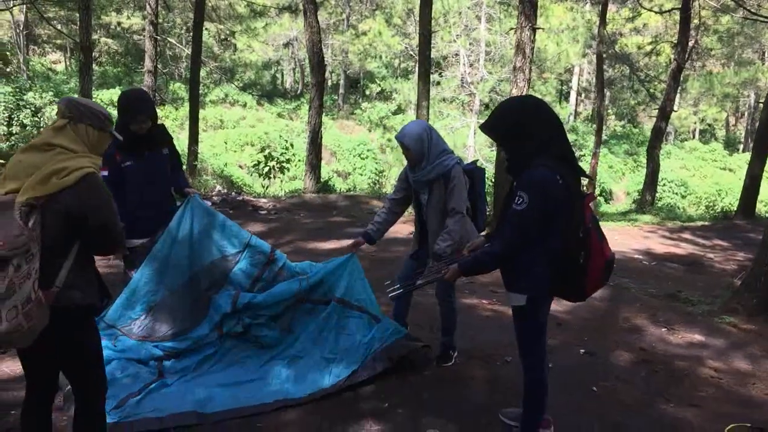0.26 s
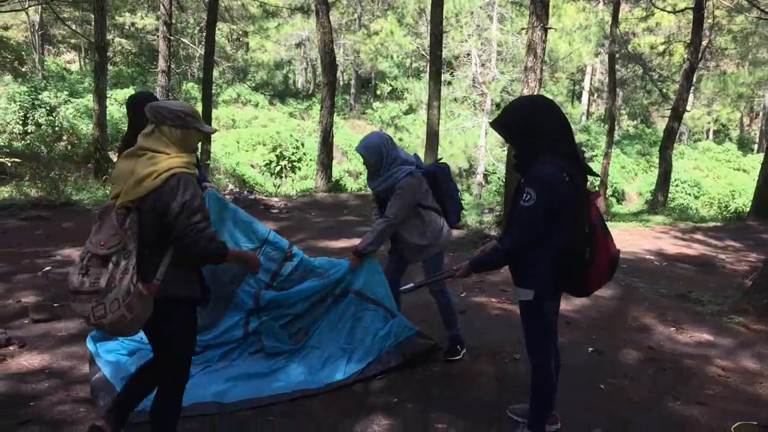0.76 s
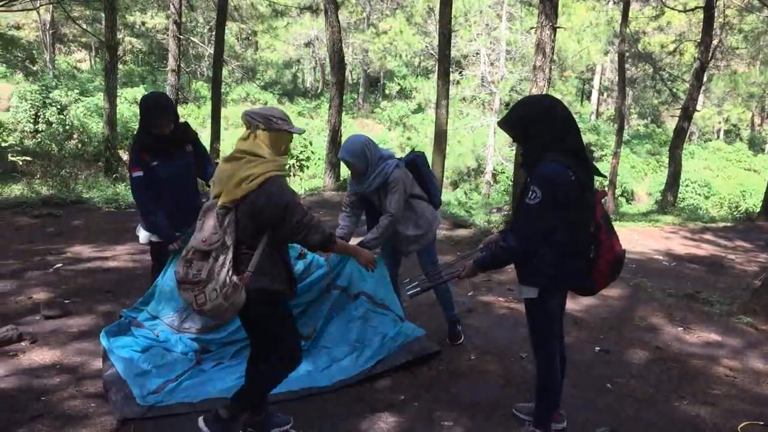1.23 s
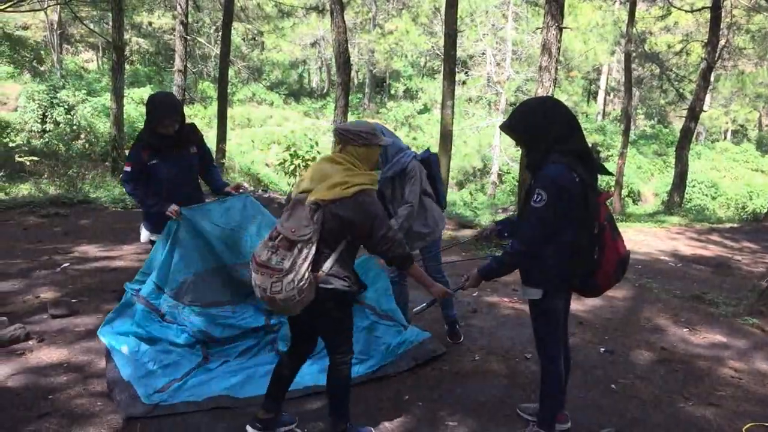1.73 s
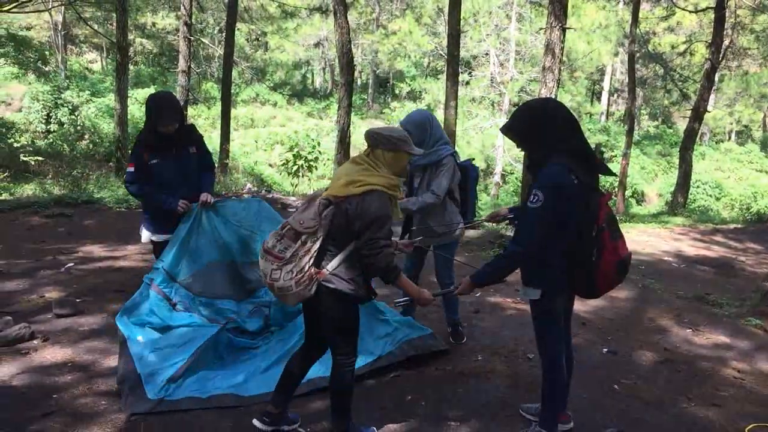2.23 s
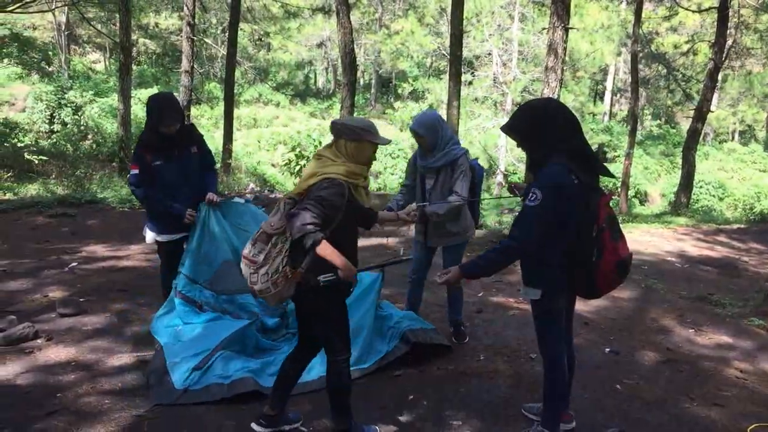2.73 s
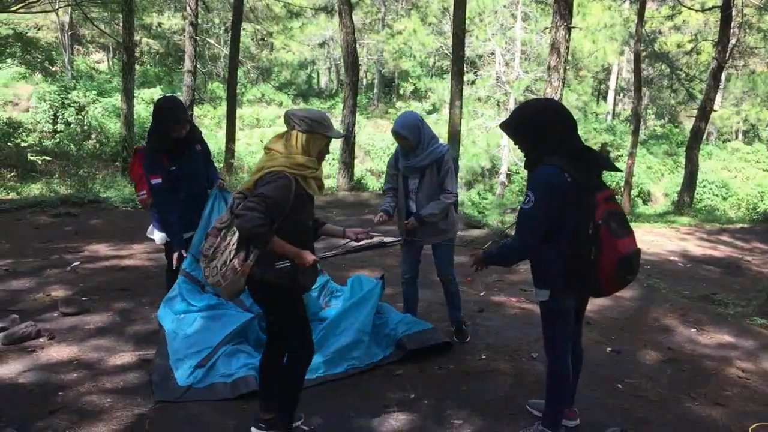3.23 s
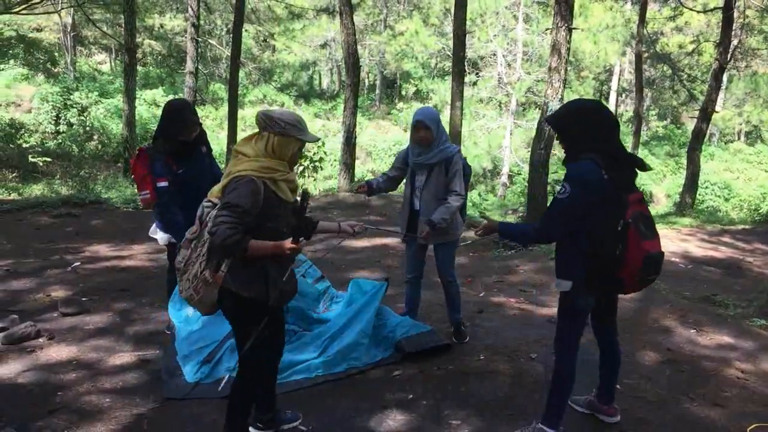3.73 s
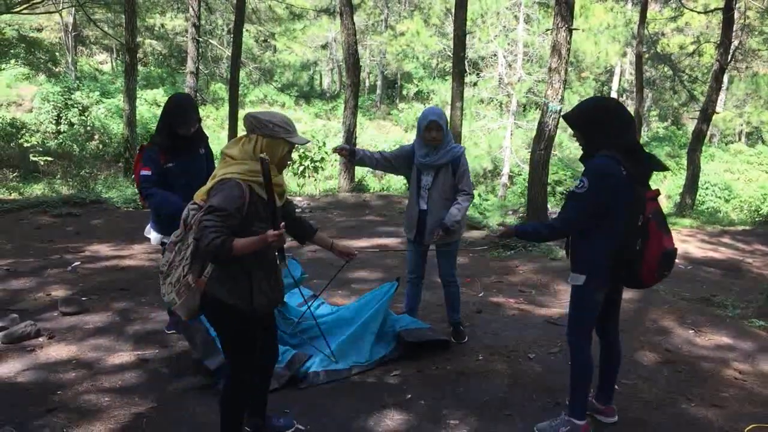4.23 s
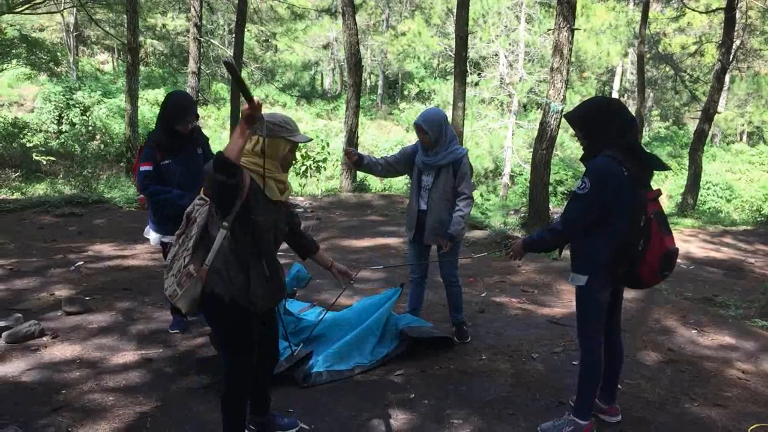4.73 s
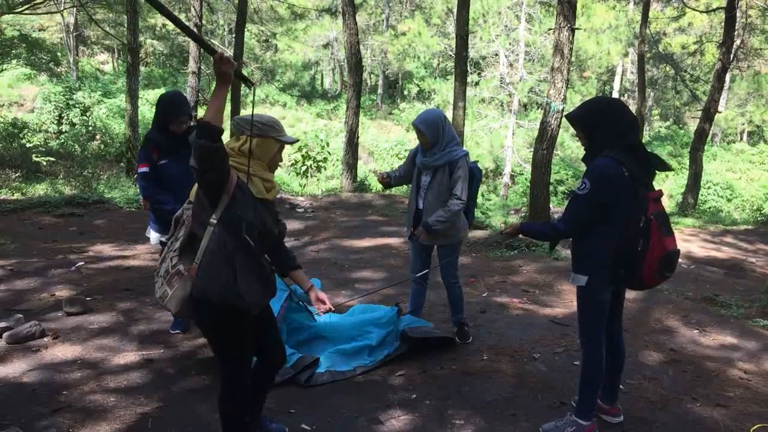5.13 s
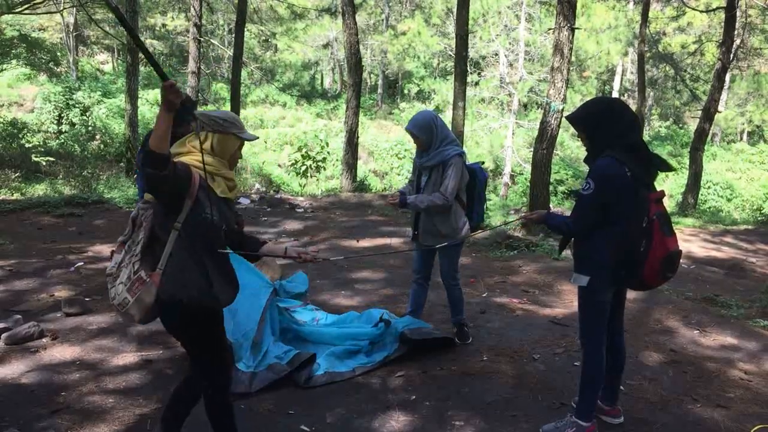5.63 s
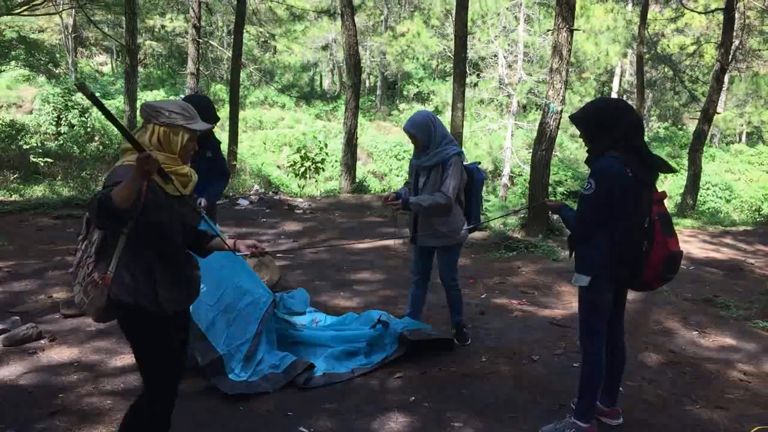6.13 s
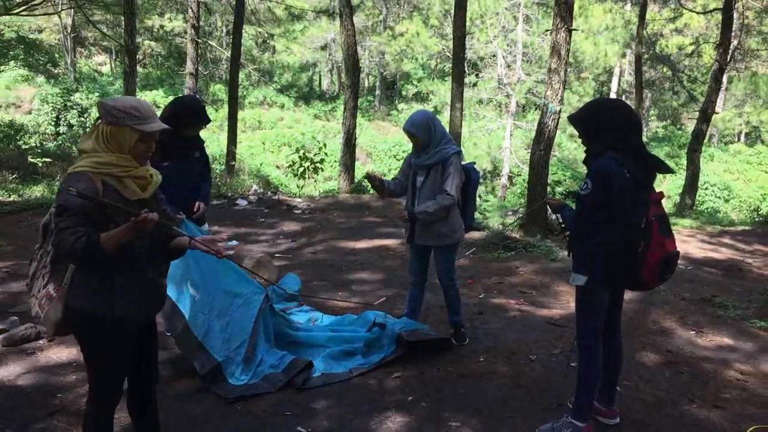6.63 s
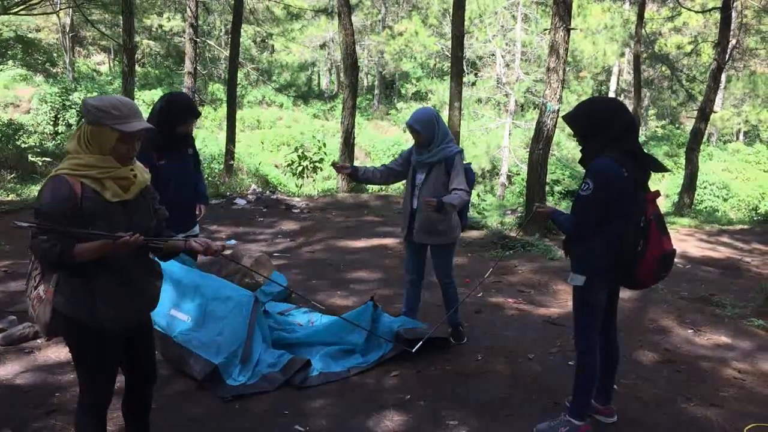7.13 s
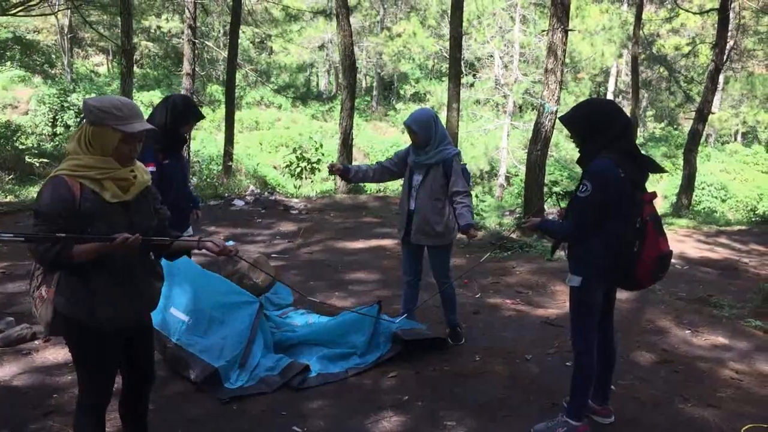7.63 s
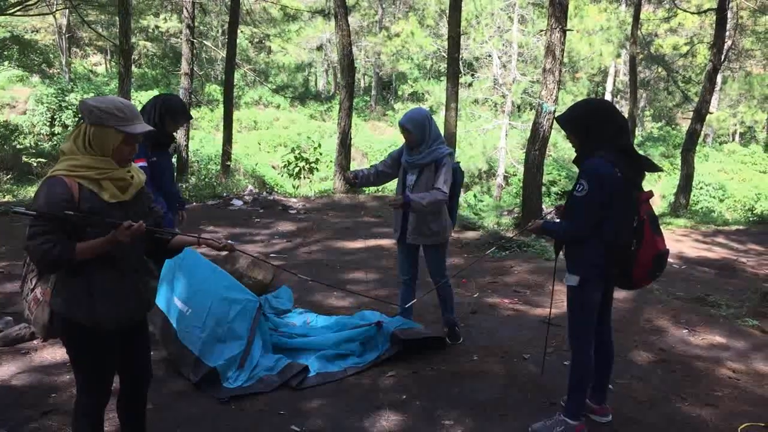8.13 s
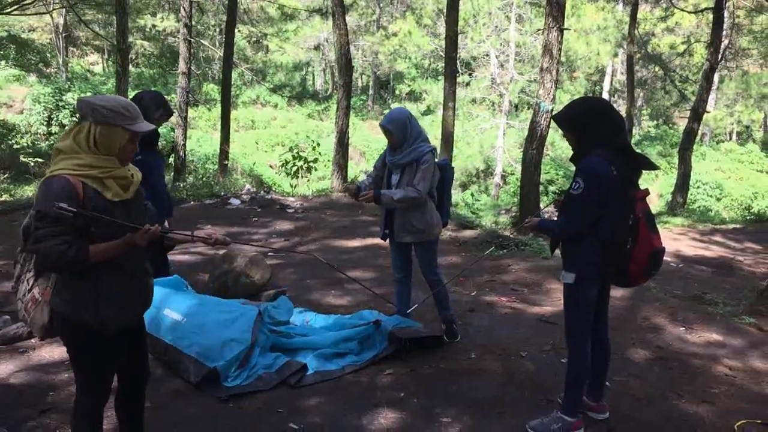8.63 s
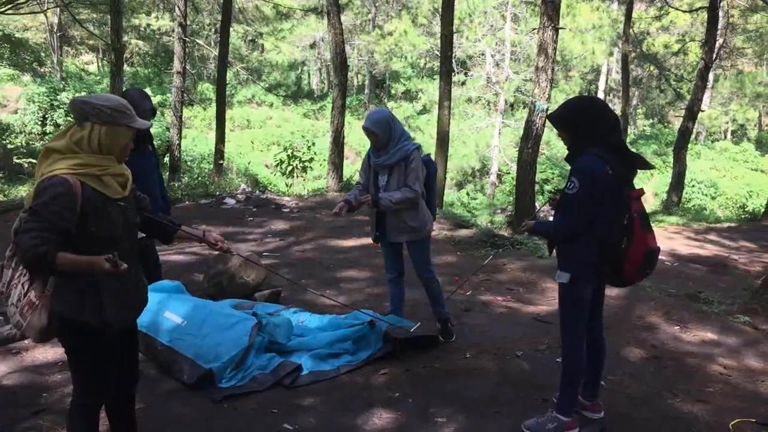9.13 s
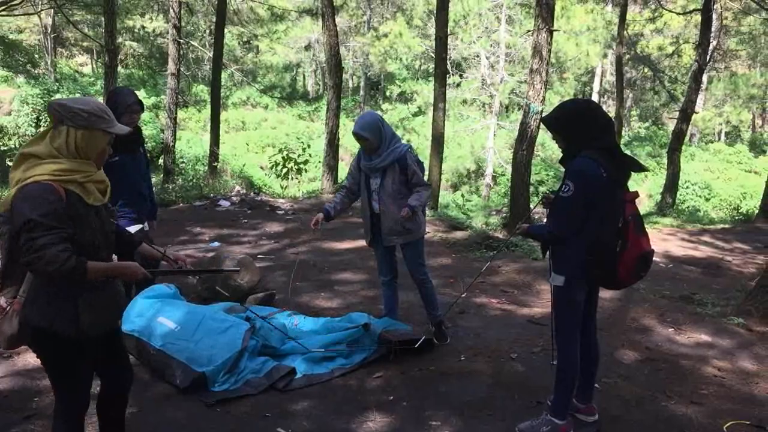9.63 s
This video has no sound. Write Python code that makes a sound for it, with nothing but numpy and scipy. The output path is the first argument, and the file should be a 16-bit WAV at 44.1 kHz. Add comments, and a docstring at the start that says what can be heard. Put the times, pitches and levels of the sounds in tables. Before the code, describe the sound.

Wind booms dully on the microphone over hushing leaves as tent poles click, nylon rustles, a songbird repeats its phrase, and heavy thuds land from midway.

```python
"""Wind booms dully in a microphone housing over the hush of the trees at a forest campsite, and nylon rustles.
Metal tent poles clink as they are fitted together, a songbird repeats a four-note phrase between the trunks,
and from midway poles thud down, the first close by. The sound stops short near the end.
Wind, leaves and cloth are resonated noise or grains; poles are struck modes; thuds are dispersed pulses
with a rumble; the bird is gliding sines with an echo and a haze."""
import sys
import numpy as np
from scipy import signal
from scipy.fft import rfft, irfft, next_fast_len
from scipy.io import wavfile
from scipy.ndimage import uniform_filter1d

SR = 44100
rng = np.random.default_rng(int(sys.argv[2]) if len(sys.argv) > 2 else 0)


def volts_from_decibels(level):
    """Turn decibel levels (scalar or array-like) into linear amplitude factors."""
    exponent = np.asarray(level, float) / 20
    return 10 ** exponent


def persist_wave(psi):
    """Save psi, clipped to +-1, as 16-bit WAV."""
    counts = np.round(np.clip(psi, -1, 1) * 32767).astype(np.int16)
    wavfile.write(sys.argv[1], SR, np.atleast_2d(counts).T)


N = 435266

# cavity resonances of the housing: (centre [Hz], nominal width [Hz], relative level [dB])
PUFF_MODES = [(46, 22, 0)]
BUFFET_MODES = [(85, 15, 1), (133, 22.5, -8), (63, 22, -15.5)]
ROAR_MODES = [(192.1, 32.5, -1.5), (276.5, 46.3, 0), (341, 46, -2.5), (412.5, 50.3, -1.5), (490.7, 32, -12)]
# puffs that press on the membrane: (time of the peak [s], level [dB])
PUFFS = [(.68, -48), (1.909, -52), (2.01, -46), (2.23, -46), (2.471, -48), (3.7, -32), (3.86, -39),
         (4.29, -48), (4.711, -45), (5.08, -40.5), (5.73, -37), (6.01, -51), (6.42, -52), (7.16, -38),
         (7.569, -44), (7.89, -35), (7.991, -47), (8.6, -43), (8.8, -42)]
# swells of the deep buffeting: (time of the peak [s], level [dB])
SWELLS = [(.12, -43), (.32, -33), (0.831, -39), (1.36, -43), (1.62, -24), (1.84, -41), (2.28, -41),
          (2.522, -28), (3.152, -27), (3.49, -30), (3.82, -26.5), (4.07, -32), (4.34, -34), (4.679, -31),
          (4.8, -30), (5.15, -19), (5.39, -35), (5.8, -26), (6.52, -28), (6.81, -30), (6.96, -33),
          (7.21, -36), (7.57, -44), (8.33, -30), (8.681, -28), (8.82, -26)]
# colour of the leaves: (frequency [Hz], density [dB per Hz])
LEAF_COLOUR = [(560, -11), (680, 9), (770, -2), (860, 3.5), (1100, -0.5), (2000, -0.5), (2650, -0.5),
               (3050, -7), (3600, -5.5), (4200, -7), (4850, -12), (5400, -10.5), (6200, -14), (7500, -18.5),
               (9500, -15), (10600, -20), (15700, -25.5)]
# hands, and the fallen pole, moving the nylon:
# (time of full level [s], hold [s], level before clumping [dB], crisp treble against that [dB])
SCUFFS = [(0, 0.31, -47.5, -13), (1.076, 0.03, -46, -10), (1.539, 0.039, -40.5, -24),
          (1.604, 0.04, -42, -9), (1.652, 0.039, -37, -16), (1.71, 0.069, -39, -18.5),
          (1.956, 0.2, -47, -21), (2.222, 0.036, -39, -21), (2.29, 0.042, -44, -17),
          (2.907, 0.036, -46, -17.5), (3.074, 0.042, -52, -19), (3.393, 0.2, -52, -11.5),
          (3.882, 0.278, -45, -21.5), (5.08, 0.045, -37.5, -15.5), (5.142, .045, -43, -17),
          (5.203, 0.035, -50.5, -20), (5.25, 0.23, -51, -16), (7.005, 0.11, -54, -9),
          (8.806, 0.2, -58.5, 1)]
# poles touching each other (high) or cloth and ground (low):
# (time [s], peak before the dip of the microphone port [dB], centre of the ring [Hz],
# its spread [octaves], chatter [s])
CLINKS = [(0.2136, -37.5, 5900, .6, 0.0055), (1.071, -44, 4960, .6, .01), (2.078, -41, 5000, .5, .004),
          (2.082, -37.5, 7500, 0.69, 0.036), (2.213, -35.5, 4300, .5, 0.0037),
          (3.17, -35.5, 5200, .5, 0.0061), (3.271, -42, 6000, .8, 0.0044), (3.297, -39, 8900, 1.2, 0.02),
          (3.3248, -27.5, 6600, 0.39, 0.0029), (3.3333, -30, 5650, 1.4, 0.0065),
          (3.536, -41, 5670, .5, 0.0055), (3.65, -35, 5660, 0.44, 0.0045), (3.686, -34, 7600, 0.48, 0.0062),
          (3.965, -16, 5500, 0.4, 0.0027), (4.753, -25.5, 5000, 0.64, 0.0093),
          (4.961, -23, 4600, 0.56, 0.004), (5.0144, -45, 6200, 0.57, .008),
          (5.426, -40, 5690, 0.37, 0.0044), (6.18, -50, 11500, 0.45, 0.0052),
          (7.204, -42, 6360, 0.6, 0.025), (7.615, -39.5, 7860, 0.43, 0.027),
          (8.6275, -36, 6200, 0.4, 0.013), (0.293, -26, 1710, 0.7, 0.0056),
          (1.177, -30, 1400, 0.55, 0.0061), (1.545, -30, 1390, 0.72, 0.0097),
          (1.606, -28, 985, 0.33, 0.0062), (1.672, -24.5, 2060, 0.86, 0.0039), (1.635, -35, 2600, .4, .004),
          (1.682, -42, 950, .3, 0.0056), (1.728, -28.5, 1000, .4, .004), (1.742, -36, 2300, .4, 0.0032),
          (1.988, -38, 1700, .5, 0.0045), (2.293, -34, 1600, .5, 0.0036), (2.374, -37, 1600, 0.56, 0.0044),
          (.01, -33, 1900, .4, .004), (.035, -32.5, 1800, .5, 0.0066), (1.702, -32.5, 1970, 0.26, 0.0044),
          (1.758, -25, 1700, 1.1, 0.003), (1.762, -24, 920, .3, .006), (1.606, -38.5, 4000, .3, .004),
          (1.672, -30.5, 4000, .25, .004), (1.657, -25.5, 2300, .4, .006), (2.134, -31.5, 1720, 0.39, 0.01),
          (2.208, -31, 1700, 0.49, 0.0056), (2.955, -29.5, 960, 0.25, 0.0039),
          (3.075, -33, 935, 0.31, 0.0056), (4.13, -35, 1020, 0.44, 0.0022),
          (4.752, -16.5, 1920, 0.72, 0.0056), (5.0695, -19.5, 1200, 0.76, 0.0056),
          (5.072, -24, 2350, 0.32, 0.0085), (5.109, -30.5, 1700, 0.46, 0.0037), (5.175, -44, 1500, .3, .01),
          (5.675, -42, 1900, 0.23, .006), (6.886, -36, 1300, 0.18, 0.0059), (8.838, -30, 930, 0.2, 0.0083)]
# modes of a pole section held in the hand: (frequency [Hz], level [dB], nominal t60 [s])
POLE_MODES = [(924, 7, 0.024), (1200, 14.5, 0.0096), (1605, 12.5, 0.013), (1970, 16, 0.014),
              (2293, 12, 0.0072), (3820, 15.5, 0.015), (4540, 8.5, 0.0078), (5200, 1.5, 0.0099),
              (6200, 2.5, 0.011), (6900, -12, 0.015), (8740, -10, 0.009), (9720, -12.5, 0.0046),
              (11500, -6.5, 0.0034), (12930, -9, .004)]
# notes of the phrase: (time from the note's mark [s], frequency [Hz], relative level [dB])
CHIP = [(-.036, 3640, -18.5), (-.032, 3640, -3), (-.021, 3580, 3), (-.014, 3590, -15.5), (.002, 3580, -39)]
DOWN_SLUR = [(.002, 3950, -21), (.005, 4006, 1), (.013, 3730, -2), (.022, 3475, -3), (.032, 3200, -13),
             (.045, 2960, -29.5)]
FALL = [(-.058, 4360, -14), (-.046, 3750, -14.5), (-.03, 3380, -12.5), (-.012, 3300, -13.5),
        (.002, 3340, -8.5)]
RISE = [(-.004, 3360, -41), (.012, 3450, -4.5), (.026, 3880, -7.5), (.032, 4050, -6), (.043, 3980, -26.5)]
# opening notes of each phrase: (time [s], pitch ratio [1], chip level [dB], down-slur level [dB])
PHRASES = [(1.536, 1.006, -31.5, -33.5), (2.907, 1.01, -31, -31.5), (4.141, 1.03, -40, -34.5),
           (5.422, .995, -54, -41.5), (6.693, 1.005, -55, -34.5), (8.163, 0.96, -47, -39.5)]
# the swoop that answers them: (time near its lowest point [s], pitch ratio [1], fall level [dB], rise level [dB])
SWOOPS = [(.167, 1, -31, -29), (1.822, 1, -31, -37), (3.223, 0.97, -39, -37.5), (4.471, 1, -37, -44),
          (5.78, .99, -43.5, -40), (7.155, 0.98, -43, -37), (8.535, 0.98, -41.5, -35.5)]
# level whistles and single pips: (time [s], length [s], frequency [Hz], level [dB])
WHISTLES = [(0.018, 0.011, 3910, -39), (0.07, 0.018, 3820, -42), (0.249, 0.02, 3110, -43),
            (.308, 0.014, 3980, -50), (3.075, 0.051, 4180, -61), (1.379, 0.073, 3310, -45.5),
            (2.655, 0.05, 3320, -55.5), (2.72, 0.055, 3300, -51), (2.783, 0.056, 3310, -56),
            (3.935, 0.11, 3290, -49.5), (1.998, 0.027, 3850, -52), (5.279, 0.057, 3256, -48.5),
            (5.868, .02, 3110, -53), (6.269, 0.015, 3300, -48.5), (6.415, 0.12, 3244, -59),
            (6.536, 0.071, 3250, -46.5), (6.947, .02, 4060, -49), (6.973, 0.075, 4030, -57),
            (7.055, 0.019, 3910, -54), (7.09, .012, 4210, -54), (7.974, 0.099, 3250, -50),
            (8.63, 0.022, 3110, -51), (8.87, 0.016, 3900, -45), (8.947, 0.019, 3880, -40.5)]
# heavy blows: (time [s], peak of the blow [dB], treble shelf [dB], rumble before it dies away [dB])
THUDS = [(5.066, 1.5, -3, -18), (6.8824, -5.5, -14, -27), (7.922, -17, -20, -40), (8.838, -14, -20, -28)]
# colour of a blow: (frequency [Hz], level [dB])
THUD_COLOUR = [(40, -22), (90, -4.5), (190, 0), (300, -12), (500, -38), (1100, -33), (2300, -43),
               (3000, -58), (5000, -85)]

# steady strength of the wind on the housing: slow pressure, deep buffeting, hollow roar
LULL_DB, BUFFET_DB, ROAR_DB = -62, -35.5, -28.5
PUFF_RISE_S, PUFF_FALL_S = 0.042, 0.054
SWELL_RISE_S, SWELL_FALL_S = 0.022, 0.029
TREES_DB = -45  # before the breeze eases
SCUFF_RISE_S, SCUFF_FALL_S, SLACK_DB = 0.0093, 0.018, -57  # slack: cloth at rest
CRACK_DB = 0  # the bare contact against the ring
BEND_S = .155  # delay of a bending wave at 1 Hz; highs arrive first
TRUNKS_T60_S, TRUNKS_DB = .7, -5.5
ECHO_S, ECHO_DB, ECHO_SMEAR_S = .024, -12.5, .005  # the nearest big trunk throws each note back
STOP_S = 8.967


def level(x, db):
    """Normalisation: scale to an rms level."""
    return x * volts_from_decibels(db) / np.sqrt(np.mean(x ** 2))


def shape(points, size):
    """Spectral weighting: gain of (frequency [Hz], level [dB]) points on the bins of a real transform."""
    hz, db = np.transpose(points)
    log_f = np.log(np.arange(1, size // 2 + 2) * SR / size)
    low_cut_db = 30 * np.clip(np.log(hz[0]) - log_f, 0, None)
    return volts_from_decibels(np.interp(log_f, np.log(hz), db) - low_cut_db)


def resonate(x, hz, width):
    """Damped oscillator: a two-pole resonance, gain 1 at the centre."""
    return signal.lfilter(*signal.iirpeak(hz, hz / width, SR), x)


def walk(rate):
    """Slow random modulation: levels held for 1 / rate s and slewed twice; spread about 0.7."""
    k = int(SR / rate)
    held = np.repeat(rng.standard_normal(N // k + 1), k)
    return 0.96 * uniform_filter1d(uniform_filter1d(held, k), k)[:N]


def add(out, s, x):
    """Superposition: mix x into out from time s on."""
    i = int(s * SR)
    x = x[max(-i, 0):len(out) - i]
    out[max(i, 0):max(i, 0) + len(x)] += x


def bumps(rest_db, rows, rise, fall):
    """Addition of powers: a resting level plus (time of full level [s], hold [s], level [dB]) bumps."""
    t = np.arange(0, N, 64) / SR
    power = volts_from_decibels(rest_db) ** 2
    for s, hold, db in rows:
        before = np.clip(s - t, 0, None)
        after = np.clip(t - s - hold, 0, None)
        power = power + volts_from_decibels(db) ** 2 * np.exp(-(before / rise) ** 2 - 2 * after / fall)
    return np.interp(np.arange(N) / SR, t, np.sqrt(power))


def grains(rate, spread_db, cycles, low_hz, top_hz, tilt_db):
    """Shot noise: random kicks of uneven size ring resonances a quarter-octave apart, rate per s in each."""
    out = 0
    for octave in np.arange(0, np.log2(top_hz / low_hz), 1 / 4):
        hz = low_hz * 2 ** octave
        struck = rng.random(N) < rate / SR
        boost = np.minimum(rng.exponential(size=N), 3)  # cap on the largest grain
        kicks = struck * rng.standard_normal(N) * volts_from_decibels(spread_db * boost)
        ring = resonate(resonate(level(kicks, 0), hz, hz / cycles), hz, hz / cycles)
        out = out + volts_from_decibels(tilt_db * octave) * ring
    return out


def leafy(x):
    """Linear filtering: the colour shared by all that rustles, from the wood and the microphone port."""
    size = next_fast_len(N + N % 2, True) // 2 * 2 + 2
    return irfft(rfft(x, size) * shape(LEAF_COLOUR, size), size)[:N]


def wind():
    """Cavity resonance: eddies drive each mode of the housing, each flickering by itself; puffs press on it."""
    gains = (bumps(LULL_DB, [(s, 0, db) for s, db in PUFFS], PUFF_RISE_S, PUFF_FALL_S),
             bumps(BUFFET_DB, [(s, 0, db) for s, db in SWELLS], SWELL_RISE_S, SWELL_FALL_S),
             volts_from_decibels(ROAR_DB + 1.3 * walk(6.5)))
    out = 0
    for modes, gain, flicker_scale in zip((PUFF_MODES, BUFFET_MODES, ROAR_MODES), gains, (2.6, 2.5, 2.1)):
        boom = 0
        for hz, width, db in modes:
            eddies = volts_from_decibels(flicker_scale * walk(14)) * rng.standard_normal(N)
            # two passes narrow the band, so each is wider
            boom = boom + volts_from_decibels(db) * resonate(resonate(eddies, hz, 1.43 * width), hz, 1.43 * width)
        out = out + gain * level(boom, 0)
    return out


def trees():
    """Incoherent sources: far leaves merge, patchy in the middle and smooth on top; nearer ones stir in lumps."""
    bands = 450 * 2 ** np.arange(0, 5.4, 1 / 3)
    patch_scales = np.interp(np.log2(bands), np.log2([1000, 6000]), [3.8, .8])
    far = 0
    for hz, patch_scale in zip(bands, patch_scales):
        patches = volts_from_decibels(patch_scale * (walk(3.01) + walk(12)))
        far = far + patches * resonate(rng.standard_normal(N), hz, hz / 4)
    near_leaves = grains(40, 4.0, 16.0, 597.4, 2700, -2.7)
    hush = level(far, 0) + level(near_leaves, -11.5)
    easing_db = np.interp(np.arange(N) / SR, [2.5, 7.5], [.8, -.8])  # the breeze in the crowns eases
    return level(leafy(hush), TREES_DB) * volts_from_decibels(easing_db)


def tent():
    """Buckling and friction: stiff nylon scuffs in soft, dense lumps; taut cloth adds a crisp edge."""
    clumps = volts_from_decibels(3.1 * walk(30))
    dull_rows = [(s, hold, db) for s, hold, db, _ in SCUFFS]
    crisp_rows = [(s, hold, db + crisp_db) for s, hold, db, crisp_db in SCUFFS]
    dull_gain = bumps(SLACK_DB, dull_rows, SCUFF_RISE_S, SCUFF_FALL_S)
    crisp_gain = bumps(SLACK_DB - 6.5, crisp_rows, SCUFF_RISE_S, SCUFF_FALL_S)
    dull = level(leafy(grains(400, 3.5, 4.0, 849, 2900, -0.83)), 0)
    crisp = level(leafy(grains(2000, .8, 5.0, 3640, 6800, 1.1)), 0)
    return clumps * (dull_gain * dull + crisp_gain * crisp)


def poles():
    """Modal excitation: each contact cracks, chatters or scrapes and wakes the modes near where it rings."""
    out, t = np.zeros(N), np.arange(SR // 20) / SR
    for s, db, centre_hz, octaves, chatter in CLINKS:
        # the first touch is hardest
        push_gain = volts_from_decibels(-10.5 * t / chatter + 8 * (t < .0006)) * np.clip(t / .0003, 0, 1)
        push = rng.standard_normal(len(t)) * (t < chatter) * push_gain
        ring = 0
        for hz, mode_db, t60 in POLE_MODES:
            width = 1.5 * np.log(1000) / (np.pi * t60)
            reach_db = -6 * (np.log2(hz / centre_hz) / octaves) ** 2
            mode = resonate(resonate(push, hz, 2 * width), hz, width / 2.1)
            ring = ring + volts_from_decibels(mode_db + reach_db) * mode
        crack = push
        for _ in range(3):
            crack = resonate(crack, centre_hz, centre_hz * octaves)
        hit = ring / np.abs(ring).max() + volts_from_decibels(CRACK_DB) * crack / np.abs(crack).max()
        add(out, s, hit * volts_from_decibels(db) / np.abs(hit).max())
    return out


def bird():
    """Frequency modulation: near-sine notes glide in pitch and swell in level."""
    notes = []
    for table, pair in ((PHRASES, (CHIP, DOWN_SLUR)), (SWOOPS, (FALL, RISE))):
        for s, ratio, *levels in table:
            notes += [(s, np.array(note) * [1, ratio, 1], db) for note, db in zip(pair, levels)]
    # a whistle swells and stops more quickly than it starts
    for s, length, hz, db in WHISTLES:
        swell = [(0, hz, -10), (0.5 * length, hz, -3.5), (0.837 * length, hz, 0), (length, hz, -10)]
        notes.append((s, swell, db))
    out = np.zeros(N)
    for s, note, db in notes:
        at, hz, swell_db = np.transpose(note)
        t = np.arange(at[0], at[-1], 1 / SR)
        edge = np.clip(np.minimum(t - at[0], at[-1] - t) / 0.0019, 0, 1)
        phase = 2 * np.pi * np.cumsum(np.interp(t, at, hz)) / SR
        tone = np.sin(phase) * np.sqrt(2)  # rms of 1
        add(out, s + at[0], tone * edge * volts_from_decibels(db + np.interp(t, at, swell_db)))
    return out


def thuds():
    """Dispersion of bending waves: a blow becomes a falling sweep that ends in a boom; the ground rumbles on."""
    out, size = np.zeros(N), 2 ** 14
    f, t = np.arange(size // 2 + 1) * SR / size, np.arange(size) / SR
    dispersion = np.exp(-4j * np.pi * BEND_S * np.sqrt(f))  # delay falls as 1 / sqrt(f)
    for s, db, treble_db, rumble_db in THUDS:
        shelf = volts_from_decibels(treble_db * np.clip(np.log2(f / 400 + 1e-9), 0, 1))
        colour = shape(THUD_COLOUR, size) * shelf
        blow = -irfft(colour * dispersion, size)
        ground = level(irfft(rfft(rng.standard_normal(size)) * colour, size), rumble_db)
        rumble = ground * np.clip(t / 0.03, 0, 1) ** 2 * volts_from_decibels(-60 * t / 0.53)
        add(out, s, volts_from_decibels(db) * blow / np.abs(blow).max() + rumble)
    return out


def scene():
    """Reflection and scattering: trunks echo the bird and haze bird, poles and cloth; the rest comes direct."""
    song = bird() * volts_from_decibels(3.8 * walk(65))  # moving leaves make the song flutter
    near = poles() + tent()
    near = near - .6 * resonate(near, 3100, 600)  # the microphone port hollows close sounds here
    t = np.arange(SR // 2) / SR
    # near trunks answer at once and strongly, the far wood follows as a long faint tail
    fade = volts_from_decibels(-60 * t / .05) + volts_from_decibels(-14 - 60 * t / TRUNKS_T60_S)
    trunks = rng.standard_normal(len(t)) * fade * (t > .002)
    trunks = trunks / np.sqrt(np.sum(trunks ** 2))
    back = rng.standard_normal(len(t)) * np.exp(-((t - ECHO_S) / ECHO_SMEAR_S) ** 2)
    back = back / np.sqrt(np.sum(back ** 2))
    echo = volts_from_decibels(ECHO_DB) * signal.fftconvolve(song, back)[:N]
    haze = signal.fftconvolve(volts_from_decibels(TRUNKS_DB) * song + volts_from_decibels(-10.5) * near, trunks)[:N]
    return (song + echo + near + haze + wind() + trees() + thuds())[None]


def roll_off(x):
    """The treble ends steeply here."""
    return signal.sosfilt(signal.butter(12, 16610, fs=SR, output="sos"), x)


def record(dry):
    """Saturation: the loudest blow overloads the input with a tight knee; the sound is cut off at the stop."""
    on = np.clip((STOP_S - np.arange(N) / SR) / 0.0007, 0, 1)
    knee = dry / (1 + np.abs(dry) ** 16) ** (1 / 16)
    return roll_off(knee * on)


dry = scene()
out = record(dry)
persist_wave(out)
```